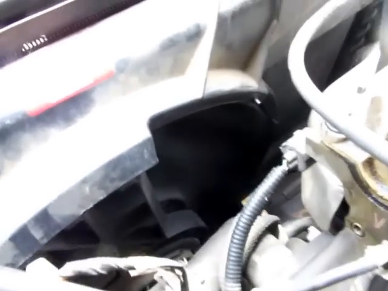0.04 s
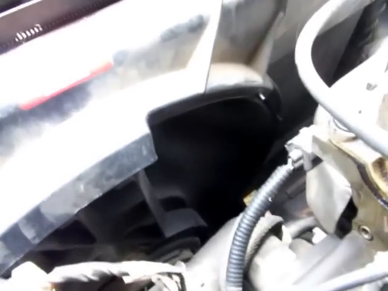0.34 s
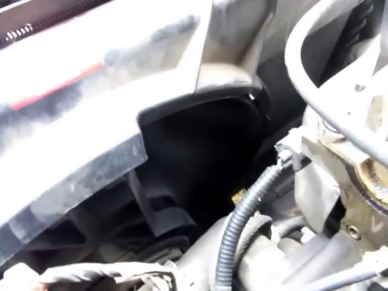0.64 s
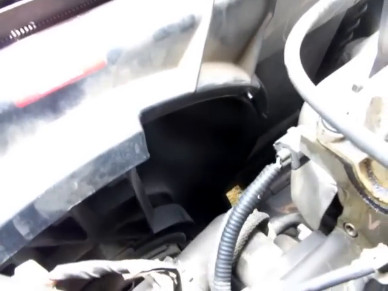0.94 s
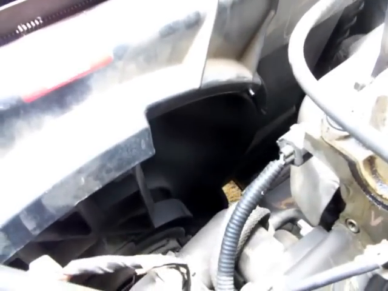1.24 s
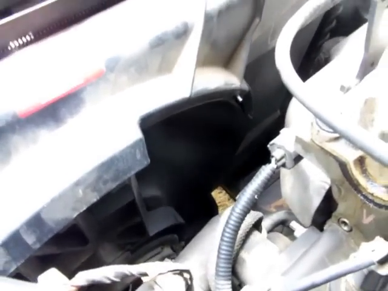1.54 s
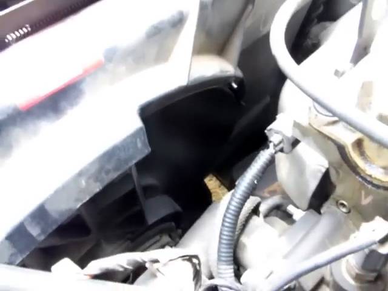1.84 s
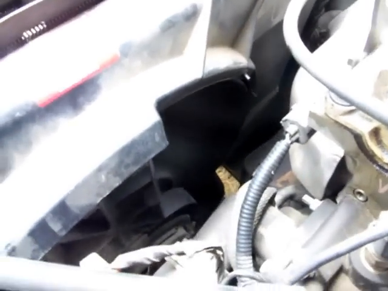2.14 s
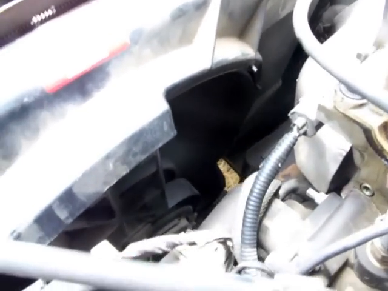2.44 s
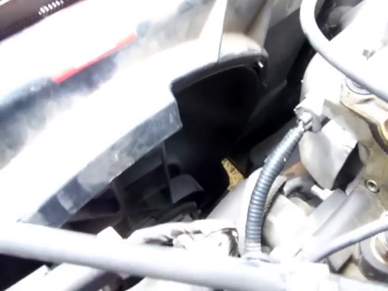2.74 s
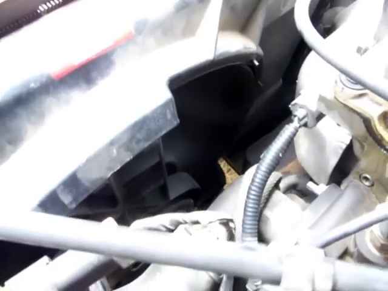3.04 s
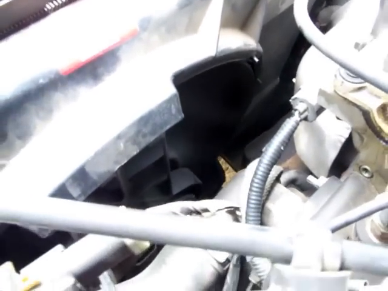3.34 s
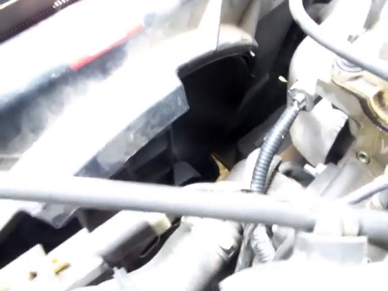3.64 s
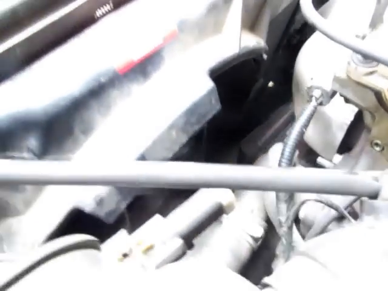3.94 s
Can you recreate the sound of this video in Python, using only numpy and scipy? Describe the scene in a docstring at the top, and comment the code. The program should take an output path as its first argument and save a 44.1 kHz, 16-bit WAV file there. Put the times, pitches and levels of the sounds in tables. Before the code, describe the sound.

Close in an open engine bay, a cooling fan's dry bearing gives a high, shaky squeal throughout, while a lower whine builds. Beneath it are rushing air, an unevenly idling engine and faint belt chirps.

```python
"""Squealing radiator fan on an idling car

Under the open bonnet, the electric fan's dry bearing rubs at the same spots in every turn. It makes
a shrill squeal, shaken by the engine, and a lower grinding whine that grows. Beneath it are rushing
air, the fan's hum, the boom of the engine's firings, a belt that chirps every lap and faint ticks."""
import sys
import numpy as np
from scipy import signal
from scipy.fft import rfft, irfft, next_fast_len
from scipy.io import wavfile
from scipy.ndimage import map_coordinates

SR = 44100
rng = np.random.default_rng(int(sys.argv[2]) if len(sys.argv) > 2 else 0)


def generate_wav(sig):
    """Save sig (samples, or channels by samples) to the path in sys.argv[1] as 16-bit PCM at SR."""
    pcm = np.round(np.clip(np.atleast_2d(sig).T, -1, 1) * 32767).astype(np.int16)
    wavfile.write(sys.argv[1], SR, pcm)


N = 176400  # 4 seconds

# Where the bearing rubs, for each of its tones
# (position [turns], half-length [turns], pitch [Hz], level [dB], roughness [radians])
SQUEAL_RUBS = [(.31, 0.14, 3619, 0.5, 0.82), (0.732, 0.047, 3760, -2.5, 1.2), (.95, .08, 3592, -1.5, 1.1)]
WHINE_RUBS = [(.24, 0.038, 2357, -0.5, 0.72), (0.451, .05, 2356, 1.5, 0.4), (0.939, 0.11, 2443, 1, 0.44)]
GRIND_RUBS = [(.15, .045, 1778, -3, 0.57), (0.422, 0.035, 1684, -6, .7), (.75, 0.07, 1786, -4.5, 0.73)]
RING_RUBS = [(.14, 0.13, 3120, 0.0025, 0.53)]
# How far average pressure bends the squeal upward (time [s], pitch rise [Hz])
SQUEAL_BEND = [(0, 30), (.5, 35), (.9, 95), (1.7, 115), (2.3, 50), (3, 35), (4, 45)]
# How each sound swells and fades (time [s], level [dB])
SQUEAL_LEVEL = [(0, -30), (.2, -25.5), (.45, -22.5), (.9, -24), (1.5, -24.5), (2, -24.5), (2.7, -24),
                (3.2, -25.5), (3.6, -29), (4, -31)]
SCRAPE_LEVEL = [(0, -33), (.5, -36.5), (1, -31), (1.7, -32), (2.4, -32.5), (3.2, -34.5), (4, -29.5)]
WHINE_LEVEL = [(0, -46), (.55, -47.5), (.9, -30.5), (1.4, -30), (1.8, -29), (2.05, -28), (2.3, -26),
               (2.75, -25), (3.15, -24), (3.45, -22.5), (3.85, -23.5), (4, -19.5)]
GRIND_LEVEL = [(0, -32.5), (1, -25), (2, -27), (4, -25)]
RING_LEVEL = [(0, -42), (.5, -39.5), (1.4, -34.5), (2.5, -44), (3.4, -46), (3.8, -30.5), (4, -32)]
AIR_LEVEL = [(0, -24), (.15, -24), (.5, -27), (1.3, -29), (2, -27), (2.6, -28.5), (3.2, -27), (4, -28)]
HISS_LEVEL = [(0, -39.5), (.25, -39.5), (.55, -44.5), (1.3, -52.5), (4, -49.5)]
BOOM_LEVEL = [(0, 3), (.25, 3), (.5, -1), (.8, 1), (1.25, -3.5), (1.5, 2.5), (1.8, 0.5), (2.2, 0.5),
              (2.7, -4), (3.3, 0.5), (4, 0)]
BELT_LEVEL = [(0, -24), (.3, -30), (1.2, -33.5), (1.8, -32), (2.6, -30.5), (4, -38)]
# The mix of low and high in each noise (frequency [Hz], level [dB])
SCRAPE_COLOUR = [(2800, -41), (3450, -25), (3650, -11.5), (3800, 7.5), (4000, 7.5), (4350, 4), (4550, -7.5),
                 (5000, -25.5), (7500, -46)]
AIR_COLOUR = [(20, -21.5), (50, -13), (95, -5), (130, -1), (175, 2), (260, -7), (350, -0.5), (600, -1),
              (800, 2.5), (920, 0), (1250, 6), (1450, 1.5), (1900, 2), (2300, 3.5), (2850, 0.5), (3150, 5),
              (3450, 4.5), (4400, 2), (5000, -4.5), (5500, -5.5), (6000, -9.5), (7200, -12), (7600, -17.5),
              (8000, -40)]
HISS_COLOUR = [(150, -7.5), (450, 3), (900, -3), (2500, -9.5), (5000, 0), (7200, -9), (8000, -31.5)]
TICK_COLOUR = [(800, -11), (2000, 0), (4500, 6), (6000, -3.5), (7500, -7.5), (8000, -27)]
# Tones in the fan's hum (frequency [times the turning rate], level [dB])
HUM_TONES = [(1, -63), (2, -56), (3, -63.5), (5, -48.5), (7, -52.5), (9, -57), (10, -53), (13, -59.5),
             (18, -46.5), (24, -53), (25, -48), (36, -56.5), (53, -45), (59, -54.5), (71, -43.5), (78, -48),
             (83, -43.5), (104, -42.5)]
# Tones in the engine's boom (frequency [times the firing rate], level [dB])
BOOM_TONES = [(1, -62), (2, -58.5), (3, -72), (4, -65.5), (5, -50.5), (6, -42), (7, -51), (8, -65.5),
              (9, -54.5)]
# The engine's uneven idle (time [s], speed [firings a second])
IDLE_SPEED = [(0, 25.64), (0.2, 25.19), (0.5, 24.05), (0.9, 22.92), (1.4, 22.71), (1.75, 23.61),
              (2.1, 25.04), (2.35, 25.36), (2.7, 25.16), (3.15, 24.23), (3.6, 24.04), (4, 24.37)]

FAN_HZ, IDLE_HZ = 32.663, 23.93  # fan turns and typical engine firings a second
SHAKE_AT, SHAKE_DB = .14, 2  # the engine's shake: peak (firing cycles), depth at IDLE_HZ
BIND_AT, BIND_DB = .08, 3.5  # the bearing sticks once a turn: position (turns), depth
SING_HZ, SING_WANDER_HZ, SING_DB = 3585, 36.32, -4.5  # the held note within the squeal
WHINE_RISE_HZ_PER_S, BELT_LAPS_PER_FIRING = 25.3, .574
RUB_SCATTER_DB, TICK_SCATTER_DB = 1.3, 3.6
TICKS_PER_S, TICK_DECAY_S, TICK_DB = 52, .0014, -47.5
TOP_HZ = 8166


def bearing(turn, firing):
    """Dry surfaces squeal, scrape and ring as each shake of the engine presses them together."""
    sag_hz = IDLE_HZ - curve(IDLE_SPEED)
    shake = swing(firing, SHAKE_AT) * amp(3 * sag_hz)  # a slower engine shakes harder
    pressure = unit(amp(SHAKE_DB * shake + BIND_DB * swing(turn, BIND_AT) + .9 * wobble(80)))
    pitch = SING_HZ + curve(SQUEAL_BEND) * pressure ** 1.5 + SING_WANDER_HZ * wobble(200)
    strength = unit(np.tanh(pressure ** 1.33 / 1.8))  # grows steeply with pressure, then levels off
    sing = np.sqrt(2) * amp(SING_DB) * strength * np.sin(2 * np.pi * np.cumsum(pitch) / SR)
    squeaks = rubs(turn, SQUEAL_RUBS, grain_rate=80) * amp(SHAKE_DB * shake)
    squeal = amp(curve(SQUEAL_LEVEL)) * (sing + squeaks)
    scrape = amp(curve(SCRAPE_LEVEL)) * unit(pressure ** 1.1 * noise(SCRAPE_COLOUR))
    rise_hz = WHINE_RISE_HZ_PER_S * np.arange(N) / SR
    whine = amp(curve(WHINE_LEVEL)) * rubs(turn, WHINE_RUBS, grain_rate=220, rise_hz=rise_hz)
    grind = amp(curve(GRIND_LEVEL)) * rubs(turn, GRIND_RUBS, grain_rate=200)
    ring = amp(curve(RING_LEVEL)) * rubs(turn, RING_RUBS, grain_rate=150)
    return squeal + scrape + (whine + grind + ring) * amp(1.1 * shake)


def rubs(turn, table, grain_rate, rise_hz=0):
    """All the rubs that set one of the bearing's tones ringing."""
    return sum(amp(db) * rub(turn, FAN_HZ, at, length, hz + rise_hz, rough, grain_rate)
               for at, length, hz, db, rough in table)


def rub(turn, rate, at, length, hz, rough, grain_rate):
    """One brief squeak a turn, never quite the same; grain_rate sets how fast its tone jitters."""
    offset = (turn - at + .5) % 1 - .5  # turns from the rubbing spot
    size = amp(RUB_SCATTER_DB * wobble(70)) * np.exp(-.5 * (offset / length) ** 2)
    return np.sqrt(2) * size * np.cos(2 * np.pi * hz * offset / rate + rough * wobble(grain_rate))


def fan(turn, firing):
    """The blades and motor hum; the air hisses and rushes with a slight flutter."""
    hum = sum(amp(db + 1.2 * wobble(8.2)) * np.sin(2 * np.pi * (multiple * turn + rng.random()))
              for multiple, db in HUM_TONES)
    flutter_db = .45 * swing(turn, .1) + .2 * swing(firing, SHAKE_AT) + .8 * wobble(160)
    rush = amp(curve(AIR_LEVEL) + flutter_db) * noise(AIR_COLOUR)
    hiss = amp(curve(HISS_LEVEL)) * noise(HISS_COLOUR)
    return np.sqrt(2) * hum + rush + hiss


def engine(firing):
    """Each firing gives a low boom."""
    from_peak = firing - .98  # the tones line up late in each firing cycle
    boom = sum(amp(db + .87 * wobble(14)) * np.cos(2 * np.pi * multiple * from_peak)
               for multiple, db in BOOM_TONES)
    return np.sqrt(2) * amp(curve(BOOM_LEVEL)) * boom


def belt(firing):
    """The engine drives a belt that chirps once a lap."""
    lap = BELT_LAPS_PER_FIRING * firing
    lap_rate = BELT_LAPS_PER_FIRING * curve(IDLE_SPEED)
    chirp = rub(lap, lap_rate, at=.437, length=.09, hz=1271.6, rough=.7, grain_rate=30)
    return amp(curve(BELT_LEVEL)) * chirp


def clatter():
    """Faint metallic ticks from the engine: bursts of noise that die away fast."""
    hits = rng.random(N) < TICKS_PER_S / SR
    sizes = amp(TICK_SCATTER_DB * np.clip(rng.standard_normal(N), -2, 2))
    fades = signal.lfilter([1], [1, -np.exp(-1 / (TICK_DECAY_S * SR))], hits * sizes)
    return amp(TICK_DB) * unit(fades * noise(TICK_COLOUR))


def amp(db):
    """Turn decibels into a multiplier."""
    return 10 ** (np.asarray(db) / 20)


def unit(x):
    """Scale to an average size (rms) of 1."""
    return x / np.sqrt(np.mean(np.abs(x) ** 2) + 1e-20)


def curve(rows):
    """Join (time [s], value) points with straight lines."""
    return np.interp(np.arange(N) / SR, *np.transpose(rows))


def wobble(rate):
    """A smooth curve through `rate` random points a second."""
    return map_coordinates(rng.standard_normal(8192), [4 + np.arange(N) * rate / SR], mode="wrap")


def swing(turn, at):
    """A wave that is +1 at one spot in each cycle and -1 opposite."""
    return np.cos(2 * np.pi * (turn - at))


def filtered(x, response):
    """Turn each frequency up or down by response(frequency)."""
    padded = next_fast_len(N + 8192)
    return irfft(rfft(x, padded) * response(np.fft.rfftfreq(padded, 1 / SR)), padded)[:N]


def noise(colour):
    """Noise shaped by a colour table, with an average size of 1."""
    hz, db = np.transpose(colour)
    white = rng.standard_normal(N)
    return unit(filtered(white, lambda f: amp(np.interp(np.log(f + 1), np.log(hz), db))))


def scene():
    """The fan turns almost steadily while the engine slows down and speeds up."""
    turn = FAN_HZ * np.arange(N) / SR + .0042 * wobble(1.966)  # fan turns so far
    firing = np.cumsum(curve(IDLE_SPEED)) / SR  # engine firings so far
    return (bearing(turn, firing) + fan(turn, firing) + engine(firing) + belt(firing) + clatter())[None]


def record(dry):
    """Cut away the treble above TOP_HZ."""
    return filtered(dry[0], lambda hz: hz < TOP_HZ)[None]


dry = scene()
out = record(dry)
generate_wav(out)
```